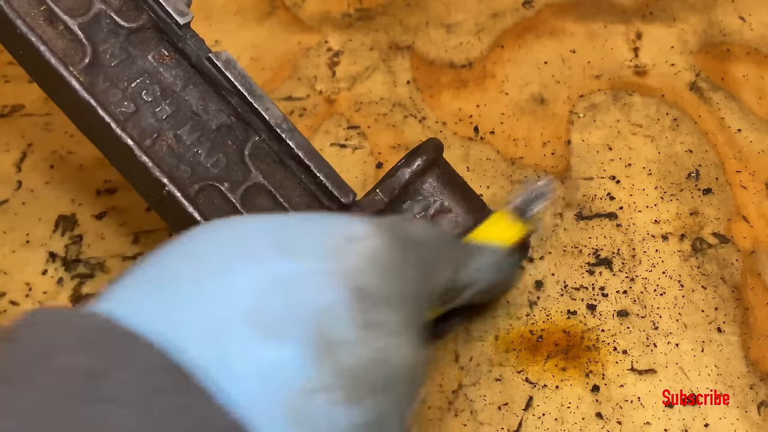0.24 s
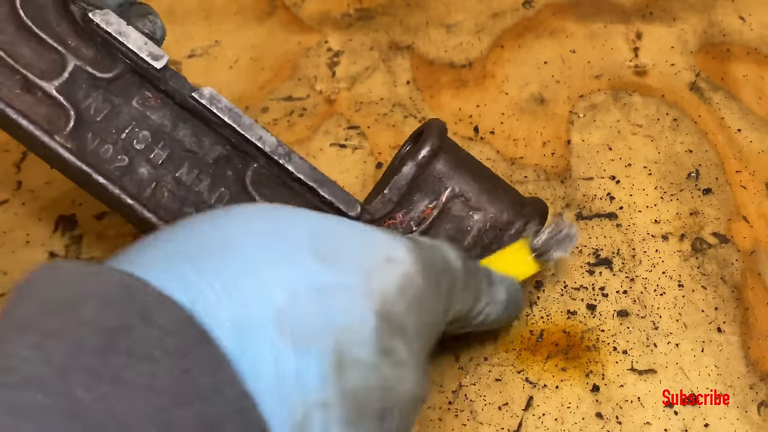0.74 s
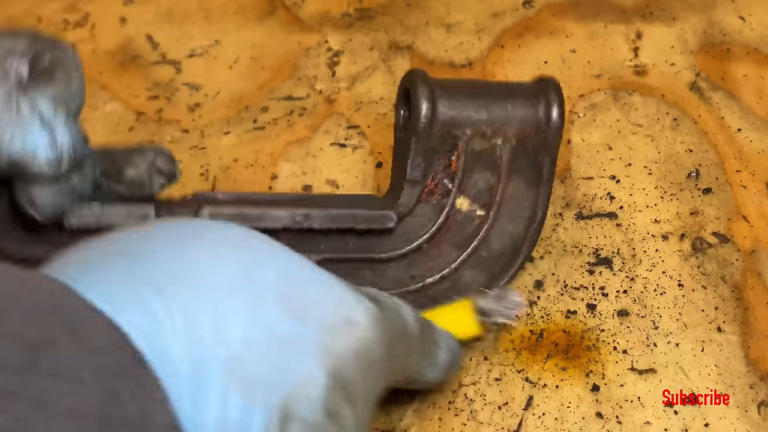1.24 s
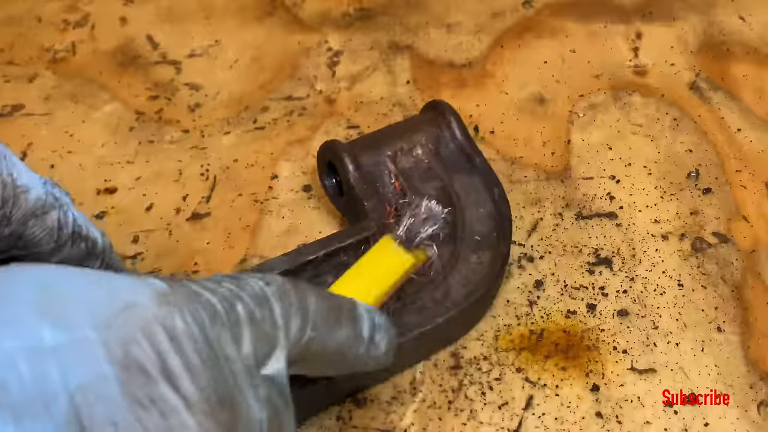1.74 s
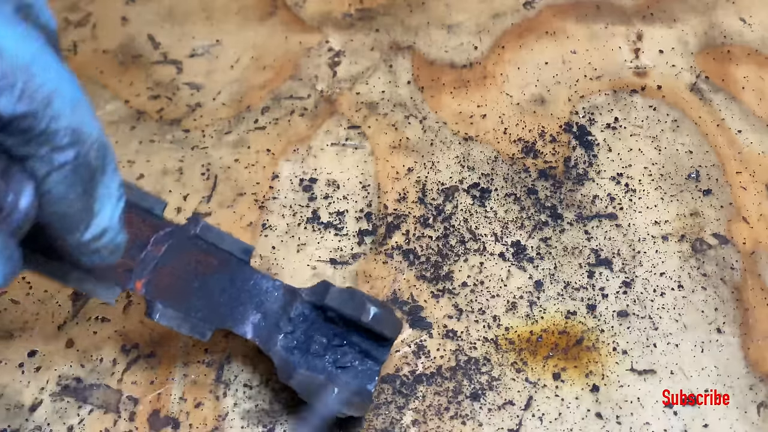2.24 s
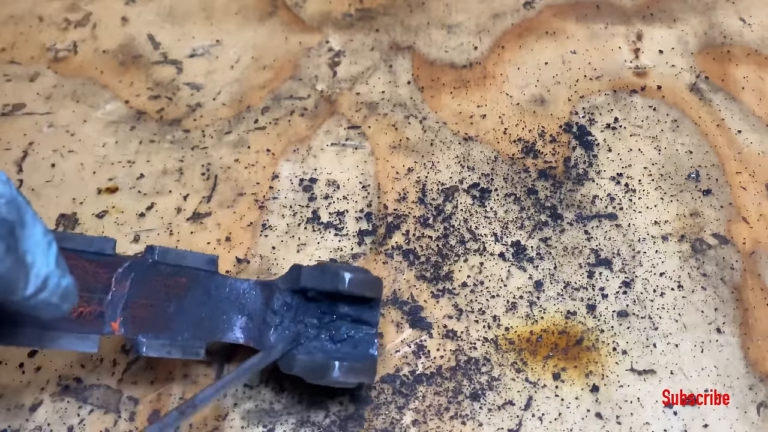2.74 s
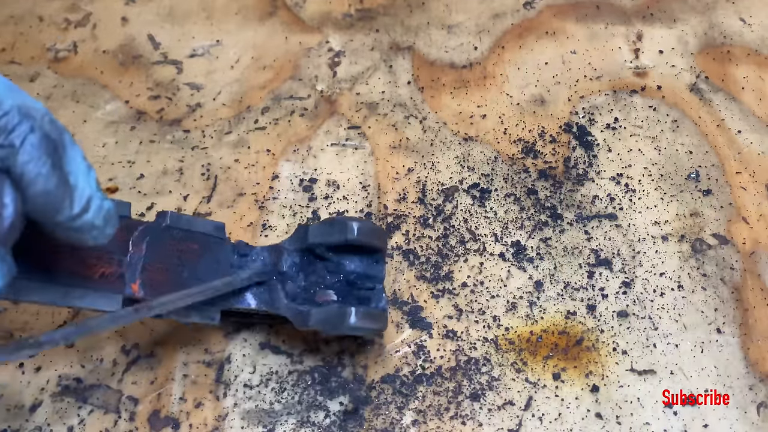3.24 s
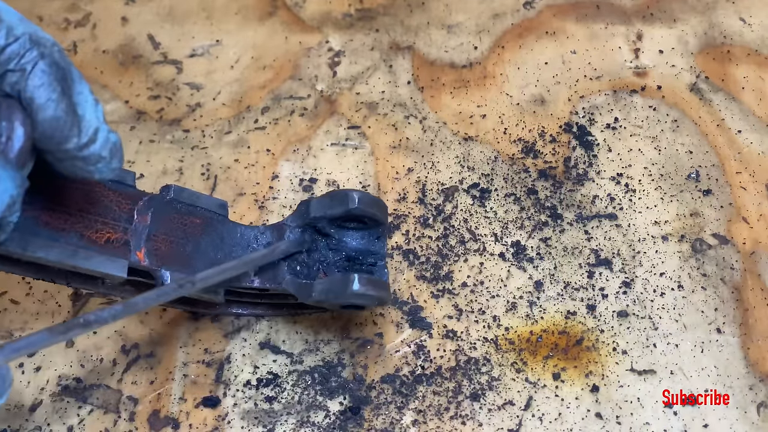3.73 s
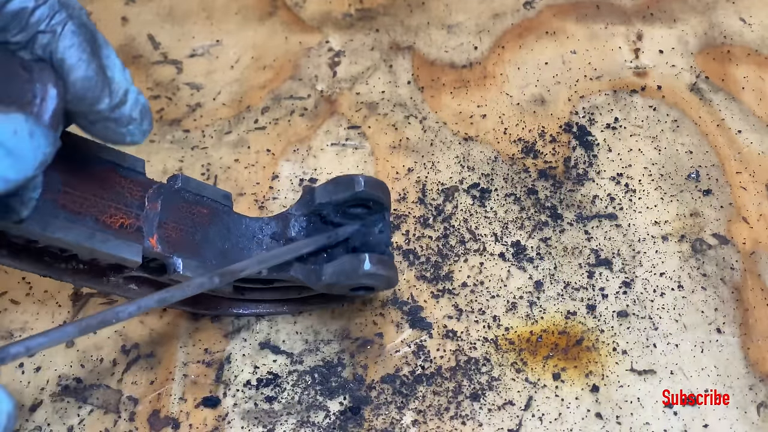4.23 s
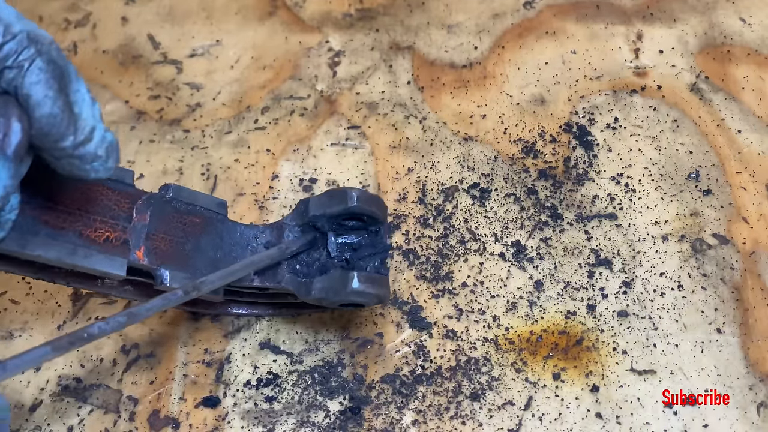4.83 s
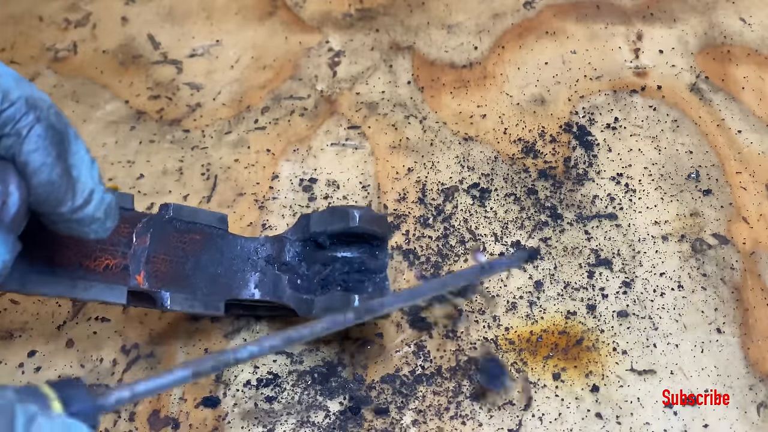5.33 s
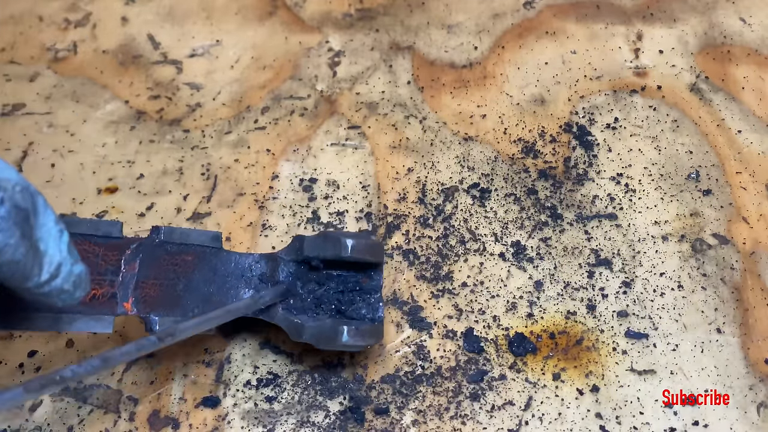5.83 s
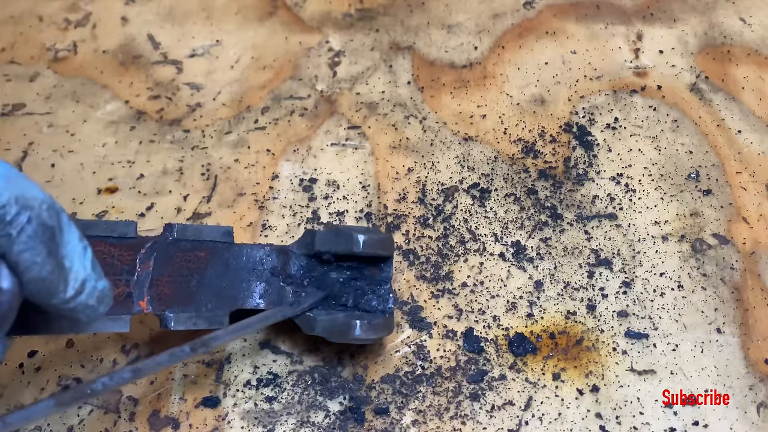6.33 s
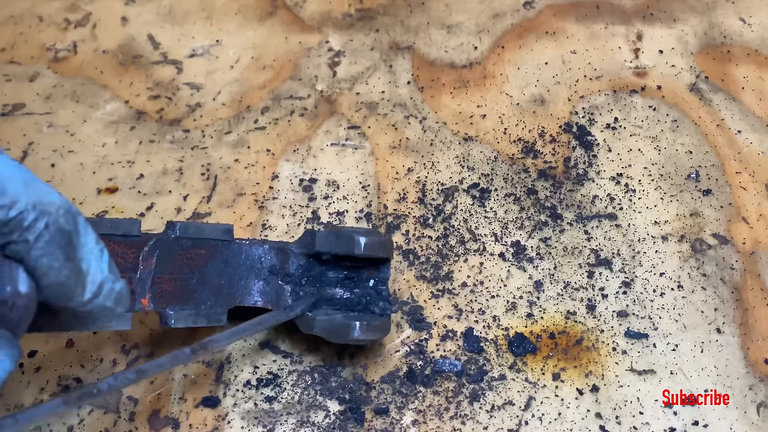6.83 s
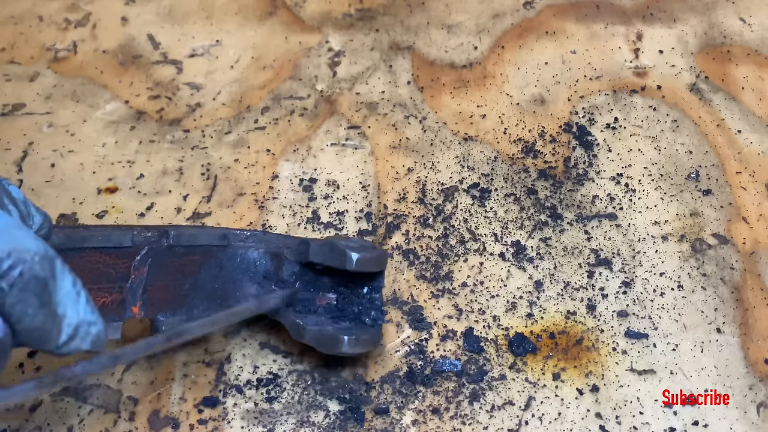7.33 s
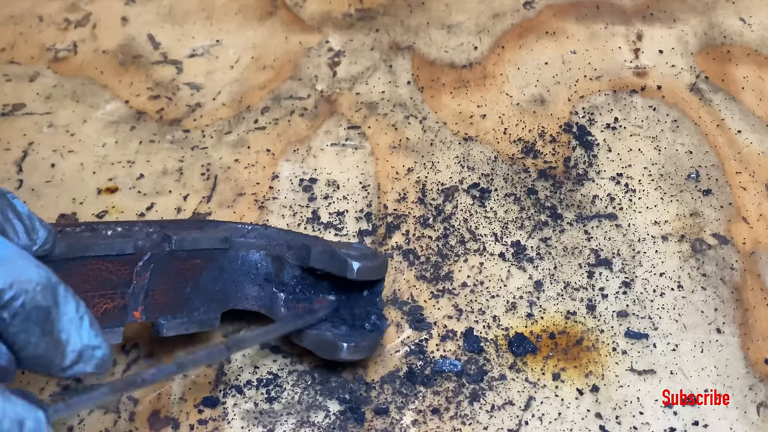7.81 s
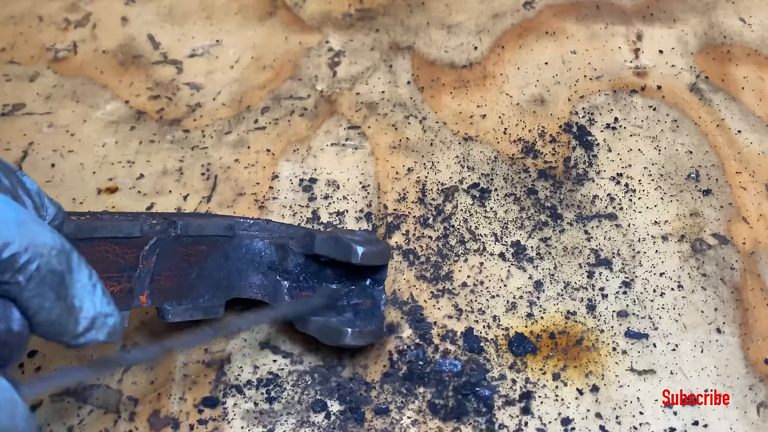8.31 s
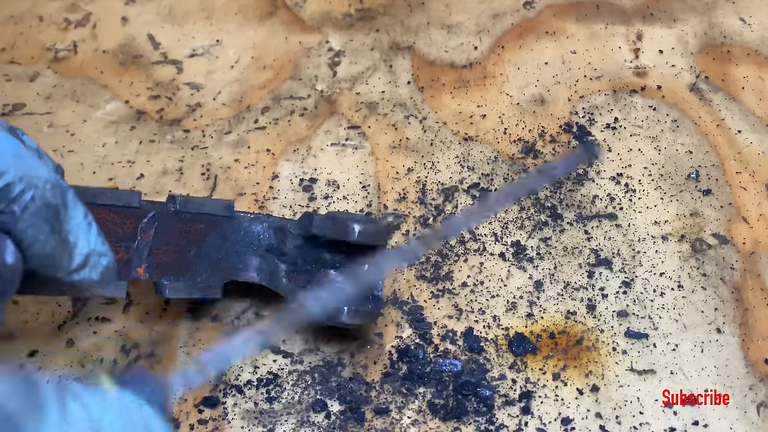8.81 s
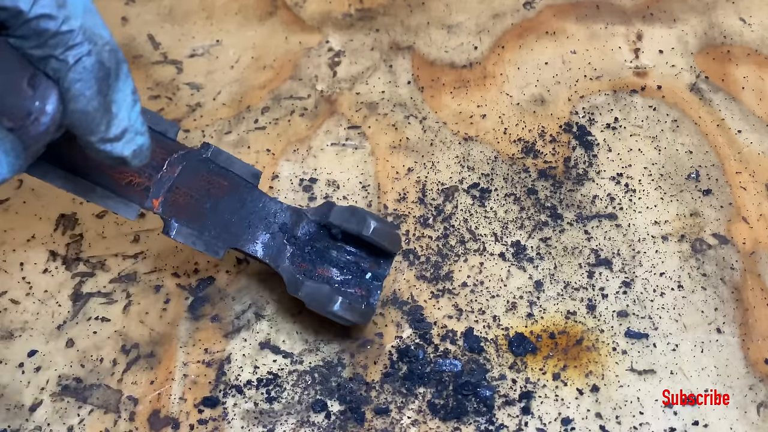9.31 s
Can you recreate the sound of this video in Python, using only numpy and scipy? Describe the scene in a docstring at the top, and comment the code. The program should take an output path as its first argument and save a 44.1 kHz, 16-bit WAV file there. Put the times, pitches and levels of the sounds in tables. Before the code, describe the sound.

Rapid, bristly hiss of wire on iron comes first, each stroke shaking the bench, then dull knocks as the piece is turned. The sound switches suddenly to a metal rod scratching hard rust: irregular crunchy scrapes, brittle clicks and tiny pings, with quiet gaps and gloved rubbing between. Picking grows stronger later, then the iron clatters onto the bench. Close microphone, small dry workshop, very low background.

```python
"""Cleaning a rusty casting

Close up, a wire brush (filtered slips) scrubs iron to and fro; knocks (bench modes, contact noise) turn it over.
After an abrupt cut a gloved hand swishes (smooth noise) and a steel rod scrapes and picks off the crust
(gritty bursts that ring metal modes), while each push rumbles the bench (filtered low grit).
Knocks on the bench close it, all over faint workshop air (filtered noise)."""
import sys
import numpy as np
from scipy import signal
from scipy.fft import rfft, irfft, next_fast_len
from scipy.io import wavfile
from scipy.ndimage import uniform_filter1d

SR = 44100
rng = np.random.default_rng(int(sys.argv[2]) if len(sys.argv) > 2 else 0)


def transcribe(u):
    """Save the signal u as a 16-bit wav file named by the first command-line argument.

    u: samples, shape (n,) or (channels, n), limited to [-1, 1]; the rate is SR.
    q: integer samples, one column per channel.
    """
    v = np.clip(np.atleast_2d(u).T, -1, 1)
    q = np.round(v * 32767).astype(np.int16)
    wavfile.write(sys.argv[1], SR, q)


N = 421596
TIME = np.arange(N) / SR
AFTER = np.arange(SR * 3 // 5) / SR  # seconds after a blow
AROUND = np.arange(-SR // 2, SR // 2) / SR  # seconds around a stroke's hardest pressure

# All table levels are relative; later gains place them in the mix.
# A treble tilt is in dB per threefold rise of (frequency + 500 Hz), pivoting at 3500 Hz.

# Brush strokes, each lasting until the next turn: [start t/s, level/dB, brightness 0-1, bench push level/dB]
BRUSHING = [(-.04, -42.5, .5, -44), (.095, -43, .75, -40), (.229, -44, .4, -44.5), (.356, -43, .65, -40.5),
            (.487, -44.5, .35, -44), (.62, -44, .4, -38.5), (.748, -44, .55, -45), (.885, -45, .5, -37),
            (1.016, -45.5, .55, -45), (1.165, -50, .7, -40), (1.26, -47, .8, -34), (1.42, -51, .5, -34.5),
            (1.53, -53, .6, -37), (1.605, -55.5, .7, -46), (1.715, -57.5, .5, -45), (1.795, -54, .8, -47)]
# Spectrum of bristles on iron: [f/Hz, level/dB]
BRISTLES = [(300, -21), (700, -9), (1400, -2), (2100, 1.5), (3300, 1.5), (3900, -3.5), (4900, 2.5),
            (5900, 0), (7200, -2), (8500, -2), (11000, -5.5), (13500, -7), (15800, -7.5)]
# Tones that the bristles excite: [f/Hz, level/dB, t60 t/s]
BRUSH_TONES = [(2320, -3.5, .08), (3150, 1.5, 0.1), (5230, -6.5, 0.074), (6180, -2.5, 0.13),
               (10600, -11, 0.076)]
# Bench rumble spectrum under the brush: [f/Hz, level/dB]
SHAKE = [(15, -37), (25, -11.5), (62, 4), (102, -7.5), (149, -2), (244, -9), (278, -3.5), (382, -4),
         (525, -14.5), (599, -26.5), (800, -19), (1040, -53.5), (1760, -120)]
# Workshop background spectrum: [f/Hz, level/dB]
AIR = [(12, -12), (25, 4), (58, 7), (100, 1), (155, -3), (400, -15), (950, -23.5), (2200, -28.5),
       (6000, -36), (9000, -37), (15500, -43)]
# Decay of the room tail: [f/Hz, t60 t/s]
ROOM = [(100, 0.43), (500, 0.043), (2000, 0.2), (6000, 0.18), (15000, 0.028)]
# Spectrum of close reflections that differ between the ports: [f/Hz, level/dB]
NEAR = [(80, -21.5), (300, -8.5), (600, -1.5), (1300, 8), (2100, -9.5), (4000, -16), (8000, -12.5),
        (15000, -5)]
# Casting bumps the bench: [t/s, thud level/dB, twice the swell time constant t/s, bass weight level/dB,
# clack level/dB, clack t60 t/s, clack treble tilt/dB, ring level/dB]
BUMPS = [(0.14, -38.5, 0.0087, 6, -37.5, 0.036, -31, -66), (.700, -46, 0.0082, 17, -34, 0.033, -0.5, -62),
         (0.933, -32.5, .02, -7, -37, 0.17, -2, -42.5), (1.225, -33, 0.01, -18, -47, 0.38, 3, -53),
         (1.338, -18, 0.011, 12.5, -39, 0.19, -17, -63), (1.369, -40, 0.0039, 0, -32.5, 0.027, -17, -44.5),
         (1.399, -22.5, 0.014, 17, -38.5, 0.19, -15, -45),
         (1.447, -4, 0.0037, -1.5, -15.5, 0.071, -22.5, -33.5),
         (1.487, -7, 0.0042, 4, -20.5, 0.12, -22, -43), (1.564, -24.5, 0.0036, 9.5, -36.5, 0.1, -9, -41),
         (1.608, -28, .004, 14.5, -45.5, 0.09, -1, -56), (1.857, -2.5, 0.0023, -8, -23, 0.079, -19, -60.5),
         (9.375, -2, 0.011, -4.5, -8, 0.054, -9, -30), (9.460, -28.5, 0.0032, 7, -19, 0.051, -12, -39.5),
         (9.485, -14, 0.0027, -1, -35, 0.062, -13, -55), (9.508, -36, 0.0038, -3, -27.5, 0.038, -17, -42.5),
         (9.523, -24, 0.0044, 2, -42, 0.095, -11, -53), (9.549, -21.5, 0.0034, 0, -23, 0.025, -21, -26)]
# Modes of the bench top: [f/Hz, level/dB, t60 t/s]
BENCH = [(59, -20.5, .16), (79, -22, 0.1), (119.6, -27, 0.035), (152, -6, 0.095), (213, -13.5, 0.097),
         (282, -4.5, 0.058), (386.5, 0, 0.11), (433, -6, 0.11), (578, -11, 0.067), (663, -18.5, 0.074),
         (886, -21, 0.023), (1100, -19, 0.023)]
# Modes of the whole casting when knocked: [f/Hz, level/dB, t60 t/s]
CASTING = [(1114, -0.5, .16), (1700, -11, 0.9), (1840, 5.5, 0.097), (2150, 3, .12), (2400, -2, .15),
           (3280, -3.5, 0.2), (3400, -0.5, 0.15), (3980, -5.5, .06), (5375, -8, 0.25)]
# Spectrum of the dull rattle in a knock: [f/Hz, level/dB]
RATTLE = [(30, -24), (75, -2.5), (160, -6.5), (330, 9), (620, 4.5), (950, -7), (1500, -16.5), (4000, -56.5)]
# Spectrum of steel on rust: [f/Hz, level/dB]
CRUST = [(250, -20.5), (750, -7.5), (1100, -1), (1450, -1), (2200, 4.5), (3000, 0.5), (3900, 0), (5500, -1),
         (7000, -0.5), (9000, -4.5), (11500, -10.5), (14000, -10.5), (15000, -21), (15800, -30)]
# Brief contact resonances, each nudged off its pitch at every touch: [centre f/Hz, level/dB, t60 t/s]
CONTACT = [(1077, 2, 0.064), (1820, 0, 0.039), (2195, -5.5, 0.012), (2804, 0, 0.058), (3130, 1.5, 0.085),
           (3900, -7, 0.012), (4100, -1.5, 0.028), (5290, -11.5, 0.016), (6100, -3.5, 0.054),
           (6304, 3, 0.01), (8600, -4, 0.031)]
# Gloved hand slides on the iron: [start t/s, length t/s, level/dB, bench push level/dB]
RUBS = [(1.807, 0.19, -67, -67), (1.982, 0.21, -61.5, -72.5), (2.144, 0.18, -66.5, -75),
        (2.286, 0.21, -68.5, -67), (2.586, 0.19, -71.5, -73), (3.741, 0.31, -69.5, -78.5),
        (4.03, 0.34, -63, -69), (4.52, 0.49, -72.5, -66.5), (5.05, 0.56, -75.5, -68),
        (6.05, 0.88, -79.5, -71.5), (7.355, 0.43, -82.5, -70), (7.815, 0.2, -60, -72),
        (8.216, 0.63, -60.5, -74), (8.797, 0.24, -69.5, -78), (8.993, .25, -66.5, -80)]
# Spectrum of rubber on iron: [f/Hz, level/dB]
GLOVE = [(500, -19), (1200, -9.5), (2100, -4), (3000, -5), (4500, -2.5), (7000, -5), (9000, -5.5),
         (14000, -8.5), (15800, -11.5)]
# Bench rumble spectrum under rod and hand, casting flat: [f/Hz, level/dB]
JUDDER = [(15, -44), (25, -25.5), (59, -0.5), (96, -13.5), (145, 3), (185, -11.5), (247, -12.5), (290, -11),
          (360, -14.5), (405, -8), (475, -21.5), (525, -16), (616, -27.5), (800, -31.5), (1040, -58.5),
          (1760, -120)]
# The same with the casting tipped on its edge: [f/Hz, level/dB]
JUDDER_TILTED = [(15, -43.5), (25, -22.5), (49, 1.5), (91, -15), (145, 7), (185, -8), (423, -4),
                 (468, -9.5), (518, -6), (607, -18), (672, -14), (800, -22), (1040, -60), (1760, -120)]
# Rod snaps through a flake and hits iron: [t/s, crack level/dB, crack t60 t/s, treble tilt/dB, ring level/dB]
PICKS = [(1.965, -61, 0.02, -1, -85.5), (3.100, -45, .05, 0, -49), (3.24, -37, .018, 4, -62.5),
         (3.249, -30.5, 0.0094, 0, -54.5), (3.364, -38.5, 0.018, -1.5, -57.5),
         (3.578, -71.5, 0.014, -0.5, -81.5), (4.112, -47, 0.02, 0.5, -62), (4.135, -37, 0.029, 2.5, -54),
         (4.361, -54.5, 0.069, -7, -53), (4.418, -62, .05, 4, -50.5), (4.514, -38, 0.11, -1.5, -40),
         (4.620, -44.5, 0.011, -11, -73.5), (5.09, -40.5, 0.039, -4, -66), (5.131, -30.5, 0.043, -5, -45),
         (5.4523, -32.5, 0.019, -6, -36), (5.375, -47.5, 0.016, 6, -66), (6.037, -40.5, 0.026, 4, -55),
         (6.078, -41, 0.011, 0, -59), (6.438, -26, 0.028, -9.5, -45), (6.579, -22.5, 0.02, 4.5, -35.5),
         (6.824, -51, 0.019, 8.5, -65.5), (7.125, -34, 0.014, -2, -49), (7.1424, -10, 0.021, 5.5, -31),
         (7.153, -20.5, 0.032, -2.5, -44.5), (7.163, -21, 0.019, -5.5, -39.5), (7.989, -39, .024, 8, -56),
         (8.059, -48.5, 0.028, 7, -53), (8.146, -47.5, 0.077, -27, -56.5),
         (8.205, -41.5, 0.031, -12, -49.5), (8.243, -40, 0.052, 2, -36.5), (8.406, -49, 0.028, 6, -63.5),
         (8.457, -34, 0.061, -2, -41), (8.552, -30, 0.01, -4.5, -39), (8.603, -25, 0.026, -10.5, -55),
         (8.6739, -19, 0.046, 6.5, -18)]
# Modes of the steel and iron in contact: [f/Hz, level/dB, t60 t/s]
METAL = [(1033, -11.5, 0.094), (1118, -9, 0.055), (1730, -10, 0.14), (2126, -22, 0.054), (2790, -12.5, .08),
         (3170, -4.5, .06), (3380, -9.5, .12), (4000, -17, 0.069), (5370, -2, 0.1), (5350, -10, 0.087),
         (5790, -19.5, .08), (6750, -10, 0.07), (6900, -11.5, 0.032), (7710, -17.5, 0.038),
         (8260, -9, 0.18), (10040, -10.5, 0.1), (11900, -15.5, .07), (12900, -17.5, .07)]
# Level of the rod's high note, which sings only while the rod is held loosely: [t/s, level/dB]
GRIP = [(2.7, 0.5), (3.15, -7), (3.3, -15.5), (4.2, -18), (4.4, -0.5), (4.52, -17), (5.0, -11),
        (5.45, -5.5), (5.9, -20), (7.8, -23), (8.0, -14), (8.3, -25)]
# Rod strokes: [hardest pressure t/s, level/dB, length t/s, treble tilt/dB, bench push level/dB]
STROKES = [(2.875, -44.5, 0.28, -2.5, -43.5), (2.964, -42.5, 0.13, -5, -50.5),
           (3.008, -44.5, 0.29, 1.5, -58), (3.1, -35.5, 0.27, -1.5, -38.5), (3.182, -37.5, 0.16, -0.5, -44),
           (3.241, -43, 0.064, -5, -38.5), (3.31, -56, 0.5, -6, -48), (3.376, -45.5, 0.11, -5.5, -52),
           (3.712, -65.5, 0.28, -2, -68), (3.897, -61.5, 0.15, 3, -58.5), (4.125, -54.5, 0.25, -9.5, -41),
           (4.242, -37, .11, -1.5, -39.5), (4.425, -51.5, 0.3, -1.5, -61), (4.603, -64, 0.35, 11, -52.5),
           (4.995, -46.5, 0.22, -4.5, -45.5), (5.089, -59, .1, -7, -38), (5.139, -46, 0.15, -6, -43),
           (5.275, -56, 0.099, -1.5, -51.5), (5.396, -53, 0.18, -5, -66.5), (5.484, -46, 0.26, 0, -55),
           (5.744, -59.5, 0.081, 8, -61), (5.907, -51.5, 0.11, 6.5, -65), (5.945, -50, 0.28, -1, -36.5),
           (6.048, -52.5, 0.6, -4, -42.5), (6.302, -52, 0.2, -4, -59.5), (6.42, -39, 0.1, -4.5, -37.5),
           (6.443, -32, 0.13, -15, -32), (6.477, -58, 0.24, 6, -63), (6.594, -44.5, 0.37, -5, -46),
           (6.712, -61, 0.22, -2, -56), (6.838, -54.5, 0.25, 2.5, -63.5), (6.898, -46.5, 0.28, -0.5, -56),
           (7.001, -37.5, 0.21, -2.5, -39), (7.105, -44.5, .55, -0.5, -64),
           (7.165, -36.5, 0.24, -14, -33.5), (7.245, -48, 0.15, 5, -55), (7.398, -68, .16, 2, -71.5),
           (7.544, -58, 0.18, -2, -61), (7.709, -63.5, 0.18, -1.5, -60), (7.787, -33.5, .17, -3.5, -35.5),
           (7.86, -39.5, 0.073, -6, -47), (7.982, -28, 0.12, -1, -34.5), (8.058, -52, 0.46, -0.5, -54),
           (8.205, -32, 0.16, -2, -39), (8.256, -39, 0.12, -4, -52.5), (8.416, -26.5, 0.11, -1, -32.5),
           (8.464, -47, 0.23, -5, -51), (8.604, -37, 0.14, -10, -35), (8.669, -39.5, 0.074, -4, -35.5),
           (9.332, -53, 0.69, 6.5, -58.5)]
# Phase lead of the left microphone port over the right: [f/Hz, phase/rad]
PORT_PHASE = [(0, 0), (500, -.1), (1030, .1), (1290, -.3), (1810, -.25), (2200, 0), (3150, .5), (3700, .2),
              (5000, .1), (7000, 0), (7600, -.7), (8500, -3.14), (9700, -6.2), (10500, -6.35),
              (12000, -9.42), (13600, -12.5), (14500, -12.7), (15300, -15.6)]
# Balance of the ports: [f/Hz, left over right level/dB]
PORT_BALANCE = [(60, -0.5), (110, -0.5), (200, 0), (380, 2.5), (700, 1.5), (1290, 1.5), (2380, 0),
                (4400, -1), (8120, 0), (15000, -0.5)]

CHANGE_S, TIPPED_S = 1.863, 6.85  # brush cuts to rod; casting tipped on its edge (s)
TURN_DB, SWING_POWER = -16.5, 1.4  # bristle level left at a turn; how sharply it swells with hand speed
TRAILING_S, TRAILING_TURN_DB = 1.21, -7.5  # from here the brush only trails and dips less at its turns
TUFTS_DB = 1  # rms level wander as whole tufts catch on the rough casting and spring free
LEAN_SHARE, LAG_S = 0.34, 0.0082  # share of push kept at the turns; delay of the bench's answer (s)
RISE_SHARE = 0.44  # part of a stroke spent building up pressure, out of a 60 dB rise and fall
SETTLE_T60 = 0.062  # added to the fall of the push: the casting rocks on after the stroke (s)
SING_HZ, SING_T60 = 6640, 0.21  # the rod's long high note (Hz, s)
AIR_DB = -66
LOW_CUT_HZ, EDGE_HZ = 36, 15850  # the microphone loses the deepest bass; upper band limit


def amp(db):
    """Decibels to gain."""
    return 10 ** (np.asarray(db) / 20)


def unit(x):
    """Scales to rms 1."""
    return x / np.sqrt(np.mean(x ** 2) + 1e-20)


def read(points, hz):
    """Reads a spectrum table on a log-frequency axis."""
    f, value = np.transpose(points)
    return np.interp(np.log(hz + 1), np.log(f + 1), value)


def curve(rows, axis=1):
    """One column of a control table at every sample."""
    rows = np.asarray(rows)
    return np.interp(TIME, rows[:, 0], rows[:, axis])


def add(mix, s, sound):
    """Mixes a sound in at s seconds."""
    part = mix[max(round(s * SR), 0):][:len(sound)]
    part += sound[:len(part)]


def fade(t60):
    """Exponential decay after a blow, falling 60 dB in t60 seconds."""
    return np.exp(-np.log(1000) * AFTER / t60)


def colour(x, spectrum, bright_db=0, size=4096):
    """Causal minimum-phase filter of unit energy; bright_db tilts the treble against the mids."""
    hz = abs(np.fft.fftfreq(size, 1 / SR))
    tilt_db = bright_db * np.log((hz + 500) / 4000) / np.log(3)
    log_gain = np.log(amp(read(spectrum, hz) + tilt_db))
    response = np.exp(np.conj(signal.hilbert(log_gain)))
    taps = np.fft.ifft(response).real[:size // 2]
    return signal.fftconvolve(x, taps / np.linalg.norm(taps))[:len(x)]


def ring(modes, scatter_db):
    """Dying modes at a nominal starting rms of 1; their shares depend on the spot that is touched."""
    hz, db, t60 = np.transpose(modes)[:, :, None]
    share = amp(db + scatter_db * rng.standard_normal(db.shape))
    waves = np.sin(2 * np.pi * (hz * AFTER + rng.random(hz.shape))) * fade(t60)
    return (share * waves).sum(0) / np.sqrt((share ** 2).sum() / 2)


def excite(x, modes):
    """Lets a rubbing force ring a set of modes, at unit energy gain."""
    response = ring(modes, 2)
    return signal.fftconvolve(x, response / np.linalg.norm(response))[:len(x)]


def grit(count, per_s, spread_db, hiss, size=900):
    """Tiny slips of uneven size over a fine hiss, at a steady mean power."""
    happens = rng.random(count) < per_s / SR
    sign = rng.choice([-1, 1], count)
    slips = happens * sign * amp(spread_db * np.minimum(rng.exponential(1, count), 4))
    x = unit(slips) + hiss * rng.standard_normal(count)
    return x / np.sqrt(uniform_filter1d(x ** 2, size) + 1e-9)


def brush():
    """Thousands of wire tips flick over the iron; the hand swings to and fro and leans on the bench."""
    starts, db, bright, push_db = np.transpose(BRUSHING)
    turns = np.interp(TIME, np.append(starts, CHANGE_S + .04), np.arange(len(starts) + 1))
    stroke = np.minimum(turns.astype(int), len(starts) - 1)
    speed = abs(np.sin(np.pi * turns)) ** SWING_POWER
    rest = amp(np.where(TIME < TRAILING_S, TURN_DB, TRAILING_TURN_DB))
    level = amp(db[stroke]) * (rest + (1 - rest) * speed)

    tufts = amp(TUFTS_DB * unit(uniform_filter1d(rng.standard_normal(N), size=220)))
    flicks = grit(N, 9000, 3.9, 0.57) * tufts
    bright = np.clip(bright[stroke], 0, 1)
    dull_hiss = colour(flicks, BRISTLES, -0.34)
    bright_hiss = colour(flicks, BRISTLES, 1.2)
    hiss = (1 - bright) * dull_hiss + bright * bright_hiss
    tones = amp(-11.5) * excite(level * flicks, BRUSH_TONES)

    lean = amp(push_db[stroke]) * (LEAN_SHARE + (1 - LEAN_SHARE) * speed)
    push = np.interp(TIME - LAG_S, TIME, lean)
    return level * hiss + tones + rumble(push, SHAKE)


def rumble(push, spectrum):
    """The casting shifts and judders on the bench under a push."""
    return colour(grit(N, 500, 5, .5, size=900) * push, spectrum)


def air():
    """The quiet background of the workshop, nearly alike at both ports."""
    shared, left, right = (colour(rng.standard_normal(N), AIR) for _ in range(3))
    return amp(AIR_DB) * (shared + .25 * np.array([left, right]))


def room(x, wet_db=-17, near_db=-14):
    """Close reflections off the bench differ between the ports, most in the mids; a short tail follows."""
    taps = rng.standard_normal((2, len(AFTER))) * (AFTER > .004)
    hz, t, z = signal.stft(taps, SR, nperseg=256)
    decay = amp(-60 * t / read(ROOM, hz)[:, None])
    tail = signal.istft(z * decay, SR, nperseg=256)[1]
    tail = tail[0] + 0.5 * tail  # mostly shared by the ports
    near = colour(taps[0] * fade(.084), NEAR)
    side = amp(near_db) * signal.fftconvolve(x, near / np.linalg.norm(near))[:N]
    wet = signal.fftconvolve(x[None], tail / np.linalg.norm(tail[0]), axes=1)[:, :N]
    return x + np.array([side, -side]) + amp(wet_db) * wet


def knocks(rows):
    """Iron clacks on the bench, whose top answers with a thud: deep when laid flat, tight on a corner."""
    out = np.zeros(N)
    hz, db, t60 = np.transpose(BENCH)[:, :, None]
    modes = amp(db) * np.sin(2 * np.pi * hz * AFTER) * fade(t60)
    modes[::2] *= -1  # neighbouring modes move in opposite senses
    lowness = np.clip(np.log2(300 / hz), 0, 1)  # full bass weight below 150 Hz, none above 300 Hz
    for s, thud_db, swell_s, bass_db, clack_db, clack_t60, bright_db, ring_db in rows:
        top = (modes * amp(bass_db * lowness)).sum(0)
        rattle = colour(rng.standard_normal(len(AFTER)), RATTLE, -bass_db) * fade(.12)
        onset = 1 - np.exp(-AFTER / max(swell_s / 2, .0003))
        thud = (top + amp(-5.5) * rattle) * onset
        add(out, s, amp(thud_db + 0.5) * thud)
        clack = amp(clack_db) * crack(clack_t60, bright_db)
        add(out, s, clack + amp(ring_db) * ring(CASTING, 2.9))
    return out


def crack(t60, bright_db):
    """A brittle burst of contact noise whose force dies away from the first instant."""
    burst = grit(len(AFTER), 5000, 9.2, 0.87, size=90) * fade(max(t60, .008))
    return contact(burst, bright_db) * amp(1.5)


def contact(force, bright_db, resonance_db=-7, shift=0.027):
    """Force at one spot of the crust; no two spots resonate quite alike."""
    direct = scatter(colour(force, CRUST, bright_db), wet_db=-4.5, t60=.03)
    modes = [(hz * np.exp(shift * rng.standard_normal()), db, t60) for hz, db, t60 in CONTACT]
    resonance = amp(resonance_db) * excite(direct, modes) / 2
    return amp(-2.0) * (direct + resonance)


def scatter(x, wet_db=0, t60=0.012, size=1200):
    """Each tiny blow echoes to and fro inside the iron for some milliseconds."""
    echoes = rng.standard_normal(size) * fade(t60)[:size]
    response = amp(wet_db) * echoes / np.linalg.norm(echoes) + signal.unit_impulse(size)
    return signal.fftconvolve(x, response / np.linalg.norm(response))[:len(x)]


def glove():
    """Soft, smooth swishes of rubber on metal, as loud as the hand is fast."""
    speed = np.zeros(N)
    for s, length, db, _ in RUBS:
        add(speed, s, amp(db) * swell(length))
    return colour(grit(N, 3000, 3.5, 0.9), GLOVE) * speed


def swell(length):
    """One smooth slide of the hand: half a sine."""
    return np.sin(np.linspace(0, np.pi, round(max(length, .02) * SR)))


def rocking(flat_db=2, tipped_db=1):
    """Each stroke of the rod and each slide of the hand pushes the casting against the bench."""
    push = np.zeros(N)
    for s, _, length, _, push_db in STROKES:
        add(push, s + LAG_S + AROUND[0], amp(push_db) * press(AROUND, length, SETTLE_T60))
    for s, length, _, push_db in RUBS:
        add(push, s, amp(push_db) * swell(length))
    flat = amp(flat_db) * rumble(push, JUDDER)
    tipped = amp(tipped_db) * rumble(push, JUDDER_TILTED)
    return np.where(TIME < TIPPED_S, flat, tipped)


def press(t, length, linger=0):
    """Pressure of one rod stroke: it builds up until t = 0, then lets go."""
    length = max(length, .03)
    rise = -t / (RISE_SHARE * length)
    fall = t / ((1 - RISE_SHARE) * length + linger)
    return np.exp(-np.log(1000) * np.where(t < 0, rise, fall))


def clinks():
    """A flake cracks off, the rod strikes bare iron and both ring; a clean strike favours the high modes."""
    out, freedom_db = np.zeros(N), curve(GRIP)
    # modes below 5 kHz lose 7 dB per octave
    struck = [(hz, db + 7.0 * min(np.log2(hz / 5000), 0), t60) for hz, db, t60 in METAL]
    for s, crack_db, t60, bright_db, ring_db in PICKS:
        note = amp(freedom_db[round(s * SR)]) * ring([(SING_HZ, 0, SING_T60)], 0)
        ringing = (ring(struck, 3.5) + note) * np.minimum(AFTER / 0.0018, 1)  # 1.8 ms onset
        add(out, s, amp(crack_db) * crack(t60, bright_db) + amp(ring_db) * ringing)
    return out


def scraping(lumps_db=2):
    """The rod's tip grinds through the crust in short strokes and keeps the metal ringing."""
    rasp = np.zeros(N)
    for s, db, length, bright_db, _ in STROKES:
        # the tip catches on lumps of rust
        lumps = unit(uniform_filter1d(rng.standard_normal(len(AROUND)), size=260))
        pressure = amp(db + lumps_db * lumps) * press(AROUND, length)
        force = pressure * grit(len(AROUND), 1300, 4.44, 0.54, size=800)
        add(rasp, s + AROUND[0], contact(force, bright_db))
    note = excite(rasp * amp(curve(GRIP)), [(SING_HZ, 0, SING_T60)])
    return rasp + amp(-15.5) * excite(rasp, METAL) + amp(-3) * note


def scene():
    """The brushing stops dead in mid-knock and the scraping side takes over; the air runs through."""
    brushed = brush() + knocks([row for row in BUMPS if row[0] < CHANGE_S])
    late_knocks = knocks([row for row in BUMPS if row[0] > CHANGE_S])
    scraped = glove() + rocking() + clinks() + scraping() + late_knocks
    change = .5 + .5 * np.tanh((TIME - CHANGE_S) / .00001)
    return (1 - change) * room(brushed) + change * room(scraped) + air()


def record(dry):
    """The two ports drift out of phase in the treble; peaks are rounded off; then the band limit."""
    size = next_fast_len(N + 4096)
    hz = np.fft.rfftfreq(size, 1 / SR)
    low_cut = signal.butter(2, LOW_CUT_HZ, "high", fs=SR, output="sos")
    dry = signal.sosfilt(low_cut, dry)
    lead = np.interp(hz, *np.transpose(PORT_PHASE))
    left = amp(read(PORT_BALANCE, hz) / 2) * np.exp(1j * lead / 2)  # each port takes half the difference
    ports = irfft(rfft(dry, size) * np.array([left, 1 / left]), size)[:, :N]
    rounded = ports / (1 + ports ** 4) ** (1 / 4)
    band_limit = signal.firwin(511, EDGE_HZ, window=("kaiser", 9), fs=SR)
    return signal.oaconvolve(rounded, band_limit[None], "same")


dry = scene()
out = record(dry)
transcribe(out)
```